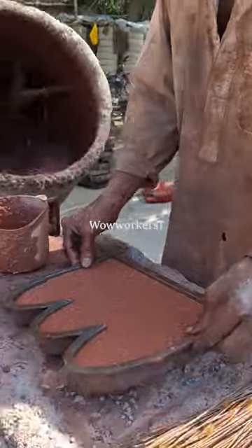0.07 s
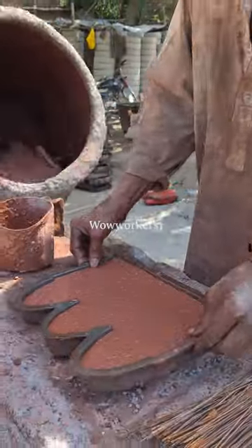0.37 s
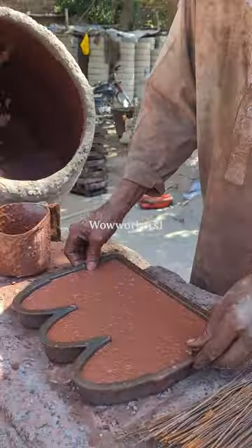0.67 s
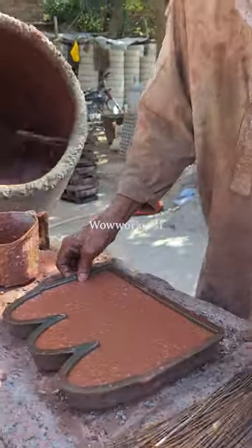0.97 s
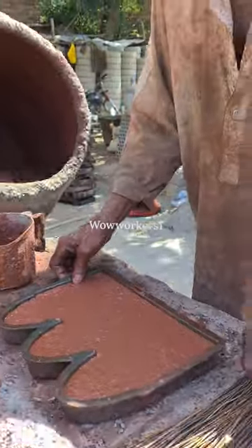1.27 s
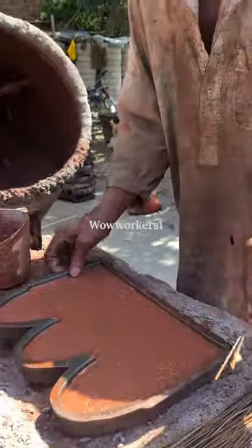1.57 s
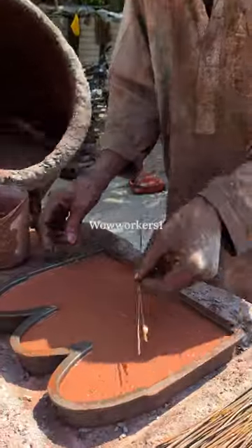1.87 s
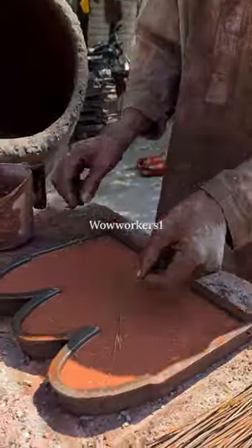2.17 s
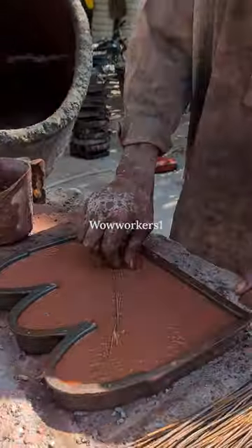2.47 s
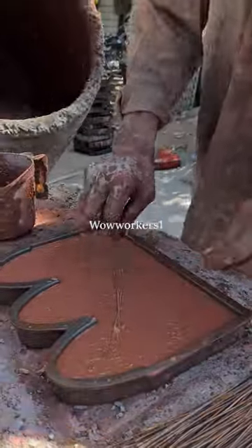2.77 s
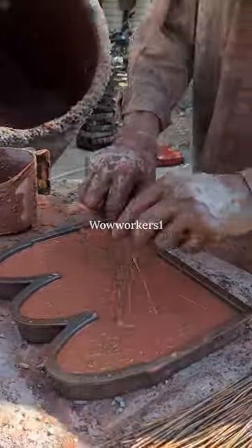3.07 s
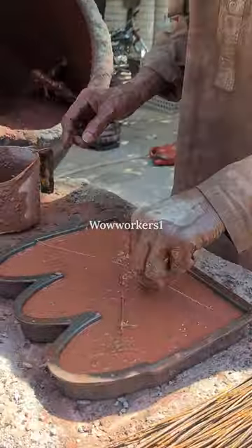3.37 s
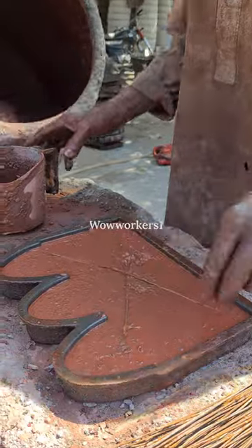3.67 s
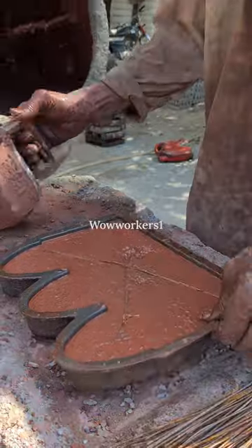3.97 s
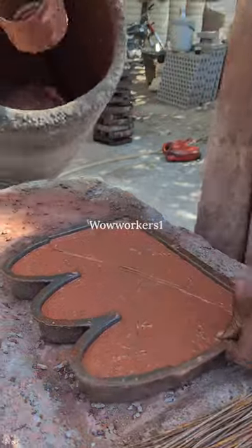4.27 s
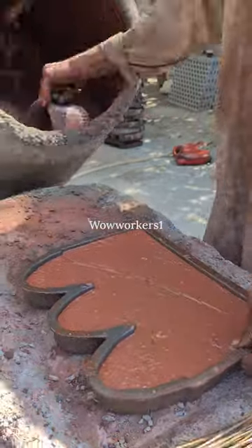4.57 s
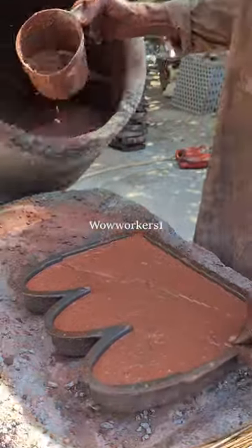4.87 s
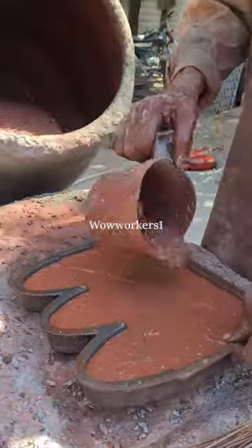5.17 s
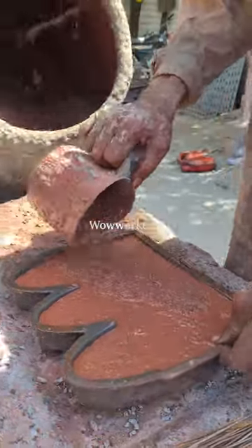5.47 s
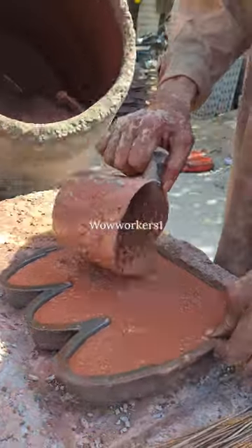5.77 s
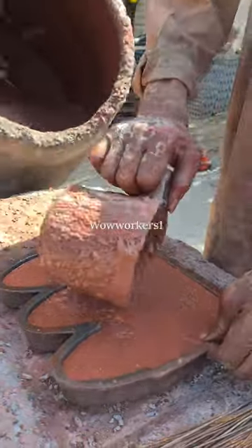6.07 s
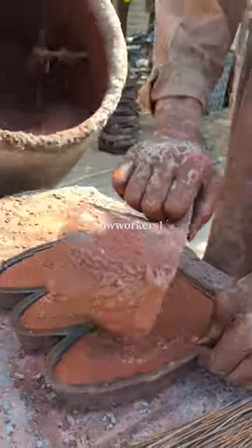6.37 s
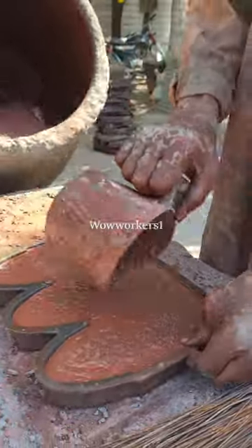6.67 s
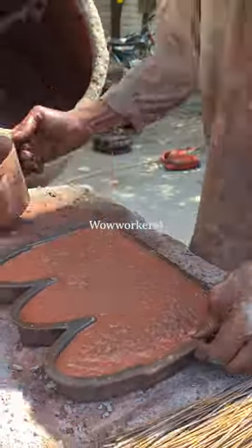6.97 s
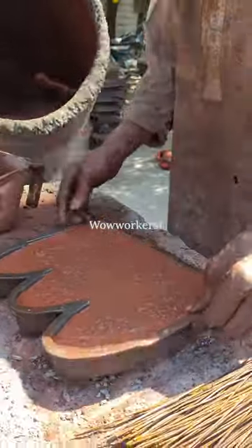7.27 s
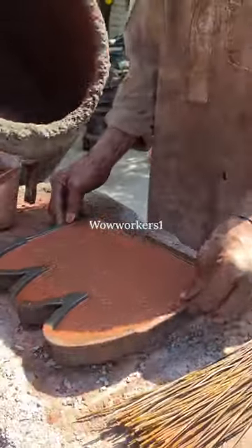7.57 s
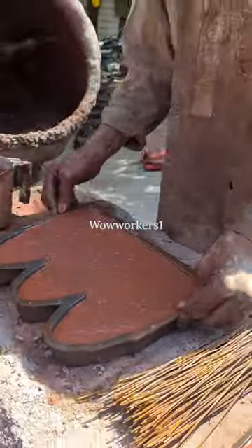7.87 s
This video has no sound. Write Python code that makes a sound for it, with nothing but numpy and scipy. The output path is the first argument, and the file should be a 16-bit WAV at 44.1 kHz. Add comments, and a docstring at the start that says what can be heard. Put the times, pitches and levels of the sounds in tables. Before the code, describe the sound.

Light, irregular taps and gritty bumps come from close by as a mould filled with wet cement is shifted on a bench outdoors. A little farther off, a mixer drones throughout, its drum swelling five times into a throbbing grind with rattling stones and a brief hoarse rub, over a soft wash of slurry. After the middle, a mug knocks and pours a short splatter of thick cement, followed by a few more taps.

```python
"""A cement mixer turns in an open yard, once every 1.556 s. Its motor drives the drum's lowest resonance
into a hum; on one part of each turn the ring gear takes the load, grinds and booms through the drum,
and the rim rubs with a stick-slip groan. Slurry washes off the two blades in turn.
Close by, a mould full of wet cement is jogged on a gritty bench, each impact ringing their resonances,
and is topped up from a mug."""
import sys
import numpy as np
from scipy import signal
from scipy.fft import rfft, irfft, next_fast_len
from scipy.io import wavfile

SR = 44100
rng = np.random.default_rng(int(sys.argv[2]) if len(sys.argv) > 2 else 0)


def materialize(psi):
    """Save the field psi as 16-bit PCM at rate SR to the path in sys.argv[1].

    A 1-D psi becomes a single channel; in a 2-D psi each row is a channel.
    """
    bounded = np.clip(np.atleast_2d(psi).T, -1, 1)
    quanta = np.round(bounded * 32767).astype(np.int16)
    wavfile.write(sys.argv[1], SR, quanta)


N = 353682
TIME = np.arange(N) / SR
FFT_SIZE = next_fast_len(N + 8192, real=True)
HZ = np.maximum(np.arange(FFT_SIZE // 2 + 1) * SR / FFT_SIZE, 1)
LEFT_RIGHT = np.array([[1], [-1]])
TURN_S, BITE_S = 1.556, 1.022  # one turn of the drum; when the gear first takes the load

# Phase between the channels for the mixer. Each row: frequency in Hz, lead of the left in radians.
MIXER_LEAD = [(20, -2.5), (820, 0.57), (1060, 2), (1300, 1.75), (1700, 2.5), (1980, -0.7), (2600, 4),
              (3000, 4.5), (4500, 6.5), (6500, 11), (16000, 36)]
# Balance of the mixer. Each row: frequency in Hz, left minus right in dB.
MIXER_BALANCE = [(20, -2), (620, 0.3), (900, -4), (1250, 1.5), (1900, 3), (2750, -5.5), (3700, -1),
                 (4900, 3), (5900, -4), (6700, -0.5), (7600, 3.5), (9000, -0.5)]
# Direct sound from the mixer. Each row: frequency in Hz, share of the power from 0 to 1.
MIXER_DIRECT = [(20, 0.95), (150, 0.92), (260, 1), (420, 0.61), (520, 0.71), (720, 0.95), (900, 0.17),
                (1100, 1), (1300, 0.13), (1530, 1), (1880, 0.24), (2700, 0.6), (4000, 0.052),
                (16000, 0.025)]
# The hand shifting the mould. Each row: time in seconds, push from 0 to 1.
HAND_PUSH = [(0, 0.5), (.8, 0.33), (1.9, 0.8), (2.2, 0.64), (3.7, 0.5), (4, 0.2), (5.3, 0.56), (6.4, 0.7),
             (6.9, 1), (7.8, 1), (8.02, 0.1)]
# Modes of mould and bench. Each row: frequency in Hz, bandwidth in Hz, gain in dB.
MOULD_MODES = [(236, 21, 0.5), (325, 48, 5.5), (574, 91, -1), (830, 220, -0.5), (1075, 58, -9),
               (1230, 140, -5)]
# Knocks of mould and mug. Each row: time in seconds, relative level in dB, contact pitch in Hz,
# relative crack level in dB, relative rattle level in dB.
MOULD_KNOCKS = [(0.08, -13.5, 635, -16, 2), (0.248, -14.5, 660, -21, 3), (0.403, -10.5, 674, -10, 8),
                (0.553, -12.5, 640, -14, 5), (0.724, -13.5, 574, -12, -10), (0.967, -19, 832, 0.5, -4),
                (1.715, -15.5, 614, -13, 1), (1.776, -16, 824, -20, -3), (1.878, -8.5, 646, -15, -3),
                (4.706, -21, 860, -20, 6), (4.761, -7, 663, -11.5, -6), (4.872, -17, 557, -23, -1),
                (4.881, -15.5, 1068, -16, -3), (4.925, -5.5, 690, -9.5, -5.5), (5.03, -22, 420, -30, 8),
                (5.082, -11, 614, -26, 0), (5.233, -15, 550, -38, 17), (6.665, -20.5, 570, -18, -6),
                (6.907, -15, 585, -26, 17), (6.959, -22.5, 970, -17, -10), (7.243, -16, 594, -24, 10),
                (7.314, -15, 544, -12, -3), (7.581, -8.5, 790, -4, -3), (7.757, -11, 716, -9, -15),
                (7.924, -9.5, 740, -18, -6)]
# Spectrum of the fine spray. Each row: frequency in Hz, relative level in dB.
SPRAY_SPECTRUM = [(1500, -27), (2400, -0.5), (3400, -3), (4000, -5), (4700, -7.5), (5700, -1), (6600, 1),
                  (7400, -4), (8500, -11.5), (10500, -11.5), (12200, -8.5), (14000, -13), (16000, -19)]
# Spectrum of the wash in the drum. Each row: frequency in Hz, relative level in dB.
WASH_SPECTRUM = [(300, -8), (900, -3.5), (1240, 4), (1600, -1), (2200, -6.5), (2550, 4.5), (2850, 0),
                 (3200, -4), (4000, -13), (8000, -35)]
# A narrow ring heard in the wash; its pitch moves up between these times. Each row: time in seconds, pitch in
# Hz.
WASH_RING = [(1.9, 2620), (2.3, 2871)]
# The main slide and afterslide off a blade. Each row: delay after tipping in seconds,
# length in seconds, relative spray level in dB, relative wash level in dB.
BLADE_SLIDES = [(0, 0.21, -39.5, -38.5), (0.309, 0.095, -42, -42)]
# Brief dips in the slurry. Each row: time in seconds, spray gain in dB, wash gain in dB,
# length in seconds.
SLURRY_DIPS = [(5.1, -1, -7, 0.36), (8.002, -2.5, -5.5, 0.33)]
# The rim rubs once a turn. Each row: peak time in seconds, relative level in dB, pitch at the peak in Hz,
# length in seconds.
RIM_RUBS = [(1.486, -29, 649, 0.07), (3.022, -25, 682, 0.1), (4.449, -25, 718, 0.054),
            (6.089, -34.5, 691, 0.18), (7.717, -28, 717, 0.086)]
# Modes of the drum. Each row: frequency in Hz, bandwidth in Hz, gain in dB.
DRUM_MODES = [(123.2, 29.4, 10.5), (133.3, 17, 5.5), (240.6, 68, 4), (287.4, 10.4, 6.5), (502, 33, 2.5),
              (610, 126, -2.5), (682, 43, -7), (796, 103, -4.5), (1076, 165, 3), (1217, 36, -24),
              (1480, 100, -4), (1982, 83, -3), (2340, 145, -10.5), (2654, 120, -4)]
# Clacks of the gear teeth. Each row: time in seconds, relative level in dB, contact pitch in Hz,
# relative crack level in dB, relative rattle level in dB.
TOOTH_CLACKS = [(1.076, -10.5, 1190, -18, 2), (1.243, -11.5, 593, -21, -11), (1.264, -8, 670, -16, 6),
                (1.413, -13.5, 661, -18, -14), (1.447, -15, 678, -21, -3), (2.618, -10, 700, -15, 5),
                (2.635, -13, 503, -23, 4), (4.214, -10, 585, -29, 5), (4.254, -10.5, 543, -30, 3),
                (4.428, -3.5, 630, -27, 14), (4.584, -10, 650, -10, -3), (7.422, -6.5, 734, -7.5, 0),
                (7.438, -12.5, 613, -19, -9)]
# Spectrum of the frame's rumble. Each row: frequency in Hz, relative level in dB.
FRAME_SPECTRUM = [(15, -2), (30, -11), (48, -3), (68, 4), (100, -9), (135, -3.5), (185, -14), (250, -16.5),
                  (320, -13), (400, -24), (700, -22.5), (2000, -56)]
# Shaking of the frame. Each row: time in seconds, relative level in dB.
FRAME_SHAKE = [(0, -36), (.2, -42), (.4, -37), (1.9, -37.5), (2.35, -46), (2.7, -39), (3.5, -40.5),
               (4.05, -37.5), (4.4, -30.5), (4.55, -40), (4.8, -37), (6.9, -34), (7.65, -37.5),
               (8.02, -34.5)]
# Throbs of the loaded drum. Each row: peak time in seconds, relative level in dB, length in seconds.
DRUM_THROBS = [(1.21, -19, 0.065), (1.393, -31, 0.076), (1.503, -26, 0.037), (1.607, -21.5, 0.041),
               (2.683, -16, 0.049), (2.787, -16, 0.036), (2.902, -29, 0.041), (3.04, -18.5, 0.058),
               (3.192, -29.5, .1), (4.287, -21, 0.08), (4.397, -20.5, 0.026), (4.494, -15, 0.062),
               (4.609, -16, 0.047), (4.738, -21, 0.037), (5.935, -20, 0.036), (6.04, -26, .07),
               (6.133, -19, 0.034), (6.297, -18.5, 0.049), (7.396, -17.5, 0.04), (7.522, -16, 0.032),
               (7.687, -21, 0.046), (7.783, -21.5, .06)]


def undb(db):
    """Amplitude ratio for a level in decibels."""
    return 10 ** (np.asarray(db) / 20)


def unit(x):
    """Normalisation to rms 1."""
    return x / np.sqrt(np.mean(x ** 2))


def over_time(table):
    """Linear interpolation of (seconds, value) rows at every sample."""
    return np.interp(TIME, *np.transpose(table))


def over_frequency(table):
    """Interpolation of (Hz, value) rows along a logarithmic frequency axis."""
    hz, value = np.transpose(table)
    return np.interp(np.log(HZ), np.log(hz), value)


def filtered(x, response):
    """Linear filtering: the spectrum is multiplied by a frequency response."""
    return irfft(rfft(x, FFT_SIZE) * response, FFT_SIZE)[..., :N]


def swell(t, length_s):
    """A Gaussian envelope around t = 0, its half-power points length_s apart."""
    return .5 ** (2 * (t / length_s) ** 2)


def wander(rate_hz):
    """Random fluctuation of rms 1: noise low-passed at rate_hz."""
    return unit(filtered(rng.standard_normal(N), 1 / (1 + (HZ / rate_hz) ** 2) ** 2))


def body(modes, top_hz):
    """Modal superposition: the summed response of resonances that radiate little above top_hz."""
    ring = sum(undb(db) / (1 + 1j * (HZ / hz - hz / HZ) * hz / width) for hz, width, db in modes)
    return ring * signal.freqs(*signal.butter(5, 1, analog=True), HZ / top_hz)[1]


def ping(t, hz, cycles):
    """A damped contact oscillation of energy 1, whose envelope peaks after the given cycles."""
    wave = np.sin(2 * np.pi * hz * t) * t * np.exp(-t * hz / cycles)
    return wave / np.linalg.norm(wave)


def grains(rate, spread_db):
    """Shot noise: three independent streams of tiny impacts of uneven size, rms 1."""
    struck = rng.random((3, N)) < rate / SR
    chance = rng.uniform(-1, 1, (3, N))[struck]
    rarity = -np.log(np.maximum(np.abs(chance), np.exp(-np.pi)))
    out = np.zeros((3, N))
    out[struck] = np.sign(chance) * undb(spread_db * rarity)
    return unit(out)


def clatter(rate, low_hz, high_hz, cycles, spread_db):
    """Random collisions: three independent streams of damped rings of varied pitch and size, rms 1."""
    count = 768
    t = np.arange(count) / SR
    out = np.zeros((3, N + count))
    for stream in out:
        for when, pitch, size in rng.random((int(rate * N / SR), 3)):
            start, hz = int(when * N), low_hz * (high_hz / low_hz) ** pitch
            stream[start:start + count] += undb(spread_db * size) * ping(t, hz, cycles)
    return unit(out[:, :N])


def impacts(table, modes, top_hz, contact_db, crack_hz, crack_db, crush_s, rattle_s, bounce_s):
    """Impact excitation: grit crushes, a dull contact rings the body, a crack follows, bits rattle on."""
    count, landing = 4096, 512  # samples
    t = np.arange(count) / SR
    ring = irfft(body(modes, top_hz))[:count]
    ring = ring / np.linalg.norm(ring)
    crack = ping(np.maximum(t - bounce_s, 0), crack_hz, cycles=0.79)
    grit_envelope = np.exp(-np.maximum((t[landing] - t) / crush_s, (t - t[landing]) / rattle_s))
    out = np.zeros((2, N + 2 * count))
    for s, db, contact_hz, sharp_db, rattle_db in table:
        grit = rng.standard_normal((3, count)) * grit_envelope
        force = (grit[0] + .5 * grit[1:]) * undb(rattle_db) / np.linalg.norm(grit[0])
        force[:, landing] += 1
        contact = undb(contact_db) * ping(t, contact_hz, cycles=0.94)
        response = ring + contact + undb(sharp_db + crack_db) * crack
        hit = signal.fftconvolve(force, response[None])[:, :count]
        start = int((s + crush_s / 2) * SR) - landing
        # the level is that of a 1 ms burst of the same energy
        out[:, start:start + count] += hit * undb(db) * np.sqrt(.001 * SR / np.sum(hit[0] ** 2))
    return out[:, :N]


def stereo_path(lead, balance_db, direct_share):
    """Direct and diffuse responses: both differ in level between channels, the direct also in phase."""
    gain, share = undb(LEFT_RIGHT * balance_db / 2), np.clip(direct_share, 0, 1)
    return gain * np.sqrt(share) * np.exp(.5j * LEFT_RIGHT * lead), gain * np.sqrt(1 - share)


def radiate(streams, colour, path):
    """Superposed fields: one stream reaches both channels directly, the other two as diffuse sound."""
    spectra, (direct, diffuse) = rfft(streams, FFT_SIZE), path
    return irfft(colour * (spectra[0] * direct + spectra[1:] * diffuse), FFT_SIZE)[:, :N]


def narrow_bass(stereo, alike_hz=260):
    """Spatial coherence: long waves reach two nearby points alike."""
    mid, side = stereo.mean(axis=0), (stereo[0] - stereo[1]) / 2
    return mid + filtered(side, 1 / np.sqrt(1 + (alike_hz / HZ) ** 4)) * LEFT_RIGHT


def mould_shuffle(path, level_db=-44):
    """Sparse, damped contacts: wet cement plops and grit bumps under the mould as a hand shifts it."""
    bumps = clatter(rate=15, low_hz=309, high_hz=1484, cycles=1.24, spread_db=25)
    return radiate(bumps, 1, path) * over_time(HAND_PUSH) * undb(level_db)


def mug_pour(path, start_s=5.34, end_s=5.64, level_db=-42):
    """Shot noise through broad resonances: thick cement slops from the mug and spatters in the mould."""
    flow = np.interp(TIME, [start_s - .02, start_s + .01, end_s - .06, end_s + .04], [0, 1, 1, 0])
    colour = body([(652, 380, 2), (1314, 880, 10), (2860, 1700, 1)], top_hz=4990)
    spatter = radiate(grains(rate=800, spread_db=-7), colour, path)
    return unit(spatter) * flow * undb(level_db)


def mould_knocks():
    """Free vibration after impact: the heavy mould and the mug bump on the bench."""
    return impacts(MOULD_KNOCKS, MOULD_MODES, top_hz=1680, contact_db=-3, crack_hz=2250, crack_db=1.5,
                   crush_s=0.00285, rattle_s=.011, bounce_s=0.002155)


def slurry_flow(first_tip_s=0.045, trickle_spray_db=-42.5, trickle_wash_db=-40):
    """Spray and wash amplitudes: a steady trickle and each half turn's slides add in power."""
    blade_s = TURN_S / 2
    power = undb([[trickle_spray_db], [trickle_wash_db]]) ** 2
    for delay_s, length, spray_db, wash_db in BLADE_SLIDES:
        from_peak_s = (TIME - first_tip_s - delay_s + blade_s / 2) % blade_s - blade_s / 2
        power = power + (undb([[spray_db], [wash_db]]) * swell(from_peak_s, length)) ** 2
    dip_db = sum(np.outer([spray_db, wash_db], swell(TIME - s, length))
                 for s, spray_db, wash_db, length in SLURRY_DIPS)
    return np.sqrt(power) * undb(dip_db)


def slurry(path, spray_db=3, wash_db=1, ring_db=-7, ring_width_hz=170, flicker_db=1.25):
    """Granular flow noise: wet sand slides off the blades as a fine spray and a hollow, ringing wash."""
    spray_level, wash_level = slurry_flow()
    spray = unit(radiate(grains(rate=14000, spread_db=1.5), undb(over_frequency(SPRAY_SPECTRUM)), path))
    wash = unit(radiate(grains(rate=5000, spread_db=0.5), undb(over_frequency(WASH_SPECTRUM)), path))
    scrape = np.array([wander(ring_width_hz) + 1j * wander(ring_width_hz) for _ in range(3)])
    carrier = np.exp(2j * np.pi * np.cumsum(over_time(WASH_RING)) / SR)
    ring = unit(radiate(np.imag(scrape * carrier), 1, path))
    hollow = (wash * undb(wash_db) + ring * undb(ring_db)) * wash_level
    return (spray * spray_level * undb(spray_db) + hollow) * undb(flicker_db * wander(65))


def rim_rub(level_db=-2, rise_hz_per_s=400, rough_rad=0.76, rasp_rad=0.19, flutter_db=3):
    """Stick-slip friction: a hoarse groan that rises in pitch as the rim binds."""
    jitter = rough_rad * wander(120) + rasp_rad * wander(600)
    groan = np.zeros(N)
    for s, db, hz, length in RIM_RUBS:
        t = TIME - s
        phase = 2 * np.pi * (hz + rise_hz_per_s * t / 2) * t
        groan += undb(db) * swell(t, length) * np.sin(phase + jitter)
    return np.sqrt(2) * groan * undb(level_db + flutter_db * wander(100))


def gear_load(attack_s=.13, hold_s=0.2704, release_s=.25):
    """Periodic load on the ring gear, from 0 to 1: it builds, holds and lets go on every turn."""
    corners = np.cumsum([0, attack_s, hold_s, release_s])
    return np.interp((TIME - BITE_S) % TURN_S, corners, [0, 1, 1, 0])


def gear_force(load, free_db=-43, loaded_db=-30, graze_db=-42, bind_db=-10):
    """Addition in power: free running, load, teeth grazing on the far side of the turn, a binding rim."""
    loaded = undb(loaded_db) * load ** 0.8
    graze = undb(graze_db) * swell((TIME - BITE_S) % TURN_S - 1.13, length_s=0.35)
    bind = sum(undb(db + bind_db) * swell(TIME - s, length) for s, db, _, length in RIM_RUBS)
    return np.sqrt(undb(free_db) ** 2 + loaded ** 2 + graze ** 2 + bind ** 2)


def ring_gear(load, path, grind_db=3.5, chatter_db=3.5, stones_db=-4, clack_db=-2.5):
    """Modal excitation of the drum: gritty teeth chatter, stones tumble, a tooth drops in and clacks."""
    force = gear_force(load)
    drum = body(DRUM_MODES, top_hz=3270)
    grit = unit(grains(rate=1200, spread_db=2.5) * undb(chatter_db * wander(30)))
    grind = radiate(grit * force, drum / np.sqrt(np.mean(np.abs(drum) ** 2)), path)
    tumble = clatter(rate=190, low_hz=436, high_hz=2570, cycles=1.74, spread_db=27)
    stones = radiate(tumble * force, np.sqrt(np.abs(drum)), path)  # mild colour: each keeps its pitch
    clacks = impacts(TOOTH_CLACKS, DRUM_MODES, top_hz=1720, contact_db=-4.5, crack_hz=2620, crack_db=2,
                     crush_s=0.00231, rattle_s=0.015, bounce_s=0.00086)
    return undb(grind_db) * grind + undb(stones_db) * stones + undb(clack_db) * clacks


def frame_rumble(gain_db=2, width=0.2):
    """Random vibration: the shaking frame radiates low noise, nearly alike in both channels."""
    mid, side = unit(filtered(rng.standard_normal((2, N)), undb(over_frequency(FRAME_SPECTRUM))))
    return undb(over_time(FRAME_SHAKE) + gain_db) * (mid + width * side * LEFT_RIGHT)


def motor_hum(load, hum_hz=98.7, sag_hz=2.473, free_db=-35.5, loaded_db=-31, stir_db=-1,
              throb_db=-2, flutter_db=2, waver_rad=0.4):
    """Forced vibration: the motor shakes the drum's lowest resonance, sagging and throbbing under load."""
    phase = 2 * np.pi * np.cumsum(hum_hz - sag_hz * load) / SR + waver_rad * wander(21.5)
    # the tumbling cement stirs the same resonance at random, so the hum beats unevenly
    stirred = 1 + undb(stir_db) * (wander(25) + 1j * wander(25))
    hum = undb(free_db + (loaded_db - free_db) * load) * stirred
    throbs = sum(undb(db) * swell(TIME - s, length) for s, db, length in DRUM_THROBS)
    throbs *= undb(throb_db + flutter_db * wander(45))
    return np.sqrt(2) * np.imag(np.exp(1j * phase) * (hum + throbs))


def scene():
    """Superposition of the mixer, farther off, and the bench close by, heard mostly by direct sound."""
    far = stereo_path(over_frequency(MIXER_LEAD), over_frequency(MIXER_BALANCE),
                      over_frequency(MIXER_DIRECT))
    bench_lead = -2 * np.pi * HZ * 0.00015  # reaches the right 0.15 ms sooner
    bench_balance_db = over_frequency([(200, 6.5), (700, 0.5), (1600, 0), (2500, -13)])
    near = stereo_path(bench_lead, bench_balance_db, direct_share=0.89)
    load = gear_load()
    mixer = ring_gear(load, far) + rim_rub() + slurry(far)
    bench = filtered(mould_knocks(), near[0]) + mug_pour(near) + mould_shuffle(near)
    return motor_hum(load) + frame_rumble() + narrow_bass(mixer + bench)


def record(dry):
    """Band limiting: a steep low-pass filter removes the treble above 15650 Hz."""
    return signal.sosfilt(signal.ellip(12, .2, 80, 15650, fs=SR, output="sos"), dry)


dry = scene()
out = record(dry)
materialize(out)
```